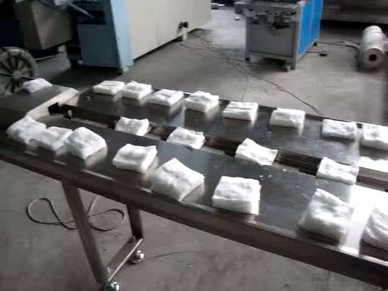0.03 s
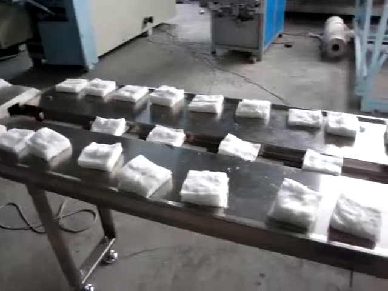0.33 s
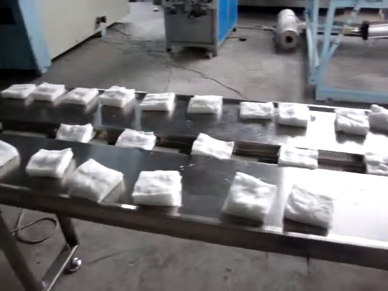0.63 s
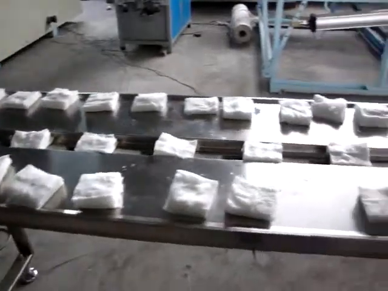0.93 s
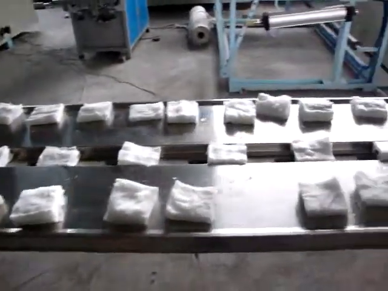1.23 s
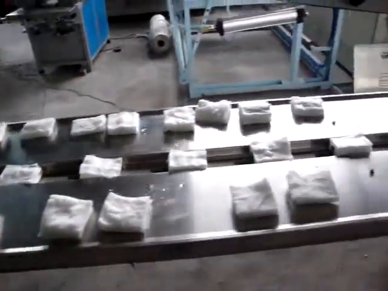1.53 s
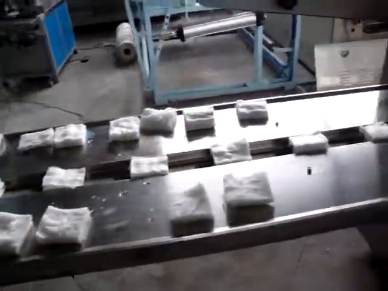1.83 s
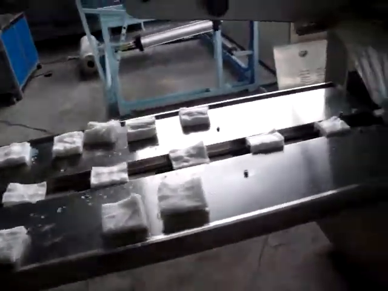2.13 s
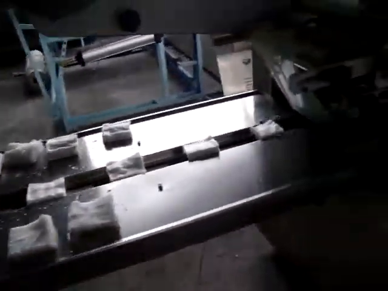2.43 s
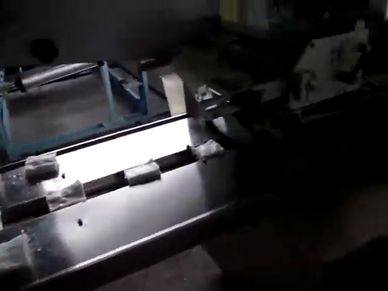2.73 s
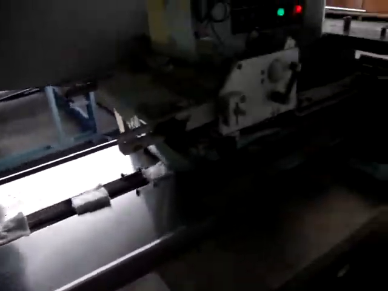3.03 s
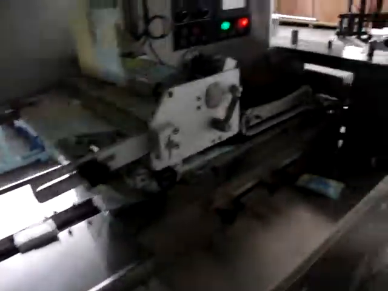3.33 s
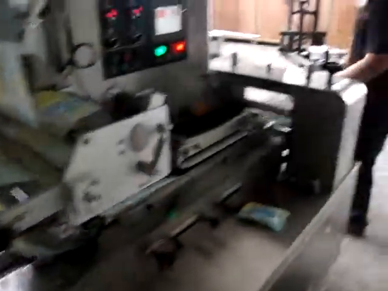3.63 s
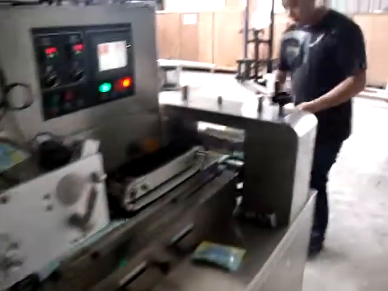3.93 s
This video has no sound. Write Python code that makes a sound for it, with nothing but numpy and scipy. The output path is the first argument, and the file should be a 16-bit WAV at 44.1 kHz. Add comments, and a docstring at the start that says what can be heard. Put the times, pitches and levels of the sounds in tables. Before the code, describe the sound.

Close to a running packaging machine, plastic film swishes, a dry bearing squeaks and sealing jaws snap shut three times. Conveyor ticks and light knocks scatter over a constant rumble and motor whine, with a dull factory echo.

```python
"""Flow-wrapping machine in a workshop

One microphone close to the machine, the large room ringing dully behind it. In each cycle, about a
second and a quarter, a dry bearing squeals, film swishes as it is pulled along and the sealing jaws
clack shut. The conveyor chain ticks and its guides knock; the drives whine and the frames rumble and
rattle throughout. The sound is mono and cuts in just after the start."""
import sys
import numpy as np
from scipy import signal
from scipy.fft import rfft, irfft
from scipy.io import wavfile

SR = 44100
rng = np.random.default_rng(int(sys.argv[2]) if len(sys.argv) > 2 else 0)


def put_to_file(sound):
    """Save the sound as 16-bit audio at rate SR, in the file named by the first command-line argument."""
    columns = np.atleast_2d(sound).T  # one column per channel
    safe = np.clip(columns, -1, 1)
    whole_steps = np.round(safe * 32767)
    wavfile.write(sys.argv[1], SR, whole_steps.astype(np.int16))


N = 176400
TIME = np.arange(N) / SR


def from_db(db):
    """Decibels to gain."""
    return 10 ** (np.asarray(db) / 20)


def rms_one(x):
    """Scale to rms 1."""
    return x / np.sqrt(np.mean(x ** 2) + 1e-20)


def at_hz(spectrum, hz):
    """Read a spectrum's level in dB on a log-frequency axis."""
    freqs, db = np.transpose(spectrum)
    return np.interp(np.log(hz + 1e-3), np.log(freqs), db)


def drift(rate_hz):
    """Smooth random wander with spread 1, mostly slower than rate_hz."""
    pole = np.exp(-40 * np.pi * rate_hz / SR)  # one step every 20 samples
    slow = signal.lfilter([1], [1, -2 * pole, pole * pole], rng.standard_normal(N // 20 + 4002))[4000:]
    return np.interp(np.arange(N) / 20, np.arange(len(slow)), rms_one(slow))


def noise(spectrum):
    """Noise of a given colour, rms 1."""
    gains = from_db(at_hz(spectrum, np.arange(N // 2 + 1) * SR / N))
    return rms_one(irfft(rfft(rng.standard_normal(N)) * gains, N))


def band_noise(hz, width_hz):
    """Noise in one broad resonance, rms 1."""
    edges = np.clip([hz - width_hz / 2, hz + width_hz / 2], 20, SR / 2 - 1)
    band = signal.butter(2, edges, "band", fs=SR, output="sos")
    return rms_one(signal.sosfilt(band, rng.standard_normal(N)))


def ring(drive, hz, t60_s):
    """One mode: a unit click rings with height 1."""
    pole, angle = from_db(-60 / (t60_s * SR)), 2 * np.pi * hz / SR
    return signal.lfilter([0, np.sin(angle)], [1, -2 * pole * np.cos(angle), pole * pole], drive + 1e-18)


def burst(start_s, attack_s, hold_s, t60_s):
    """Envelope: rise, hold, die away."""
    age = TIME - start_s
    return np.clip(age / attack_s, 0, 1) * np.exp(-np.log(1000) * np.clip((age - hold_s) / t60_s, 0, 10))


def sine(hz):
    """A sine that follows a pitch curve, rms 1."""
    return np.sqrt(2) * np.sin(2 * np.pi * (np.cumsum(hz) / SR + rng.random()))


def din():
    """Rumble and wash of all the machines in the room; each octave flickers, and all surge together."""
    # colour of machinery and hall: frequency_hz, density_db
    spectrum = [(25, -36), (45, -43), (65, -14.5), (115, -8.5), (172, -0.5), (205, -2.5), (275, 4.5),
                (340, 2.5), (480, -1.5), (680, 0.5), (870, 1), (1150, -0.5), (1500, -5), (2050, -7),
                (2650, -6.5), (3200, -11), (4500, -11), (6500, -17.5), (8500, -21), (10000, -27)]
    # swell of the din: time_s, bass_db, middle_db, treble_db
    swell = [(.12, -2, -1.5, -2.5), (.45, 0, 2.5, -1.5), (.85, 2.5, 2, 1.5), (1.1, 4.5, 1.5, 0.5),
             (1.25, 2.5, -1.5, -0.5), (1.4, 0, 4, -0.5), (1.7, -1.5, 2, -0.5), (1.9, 4.5, 3.5, 1),
             (2.1, -0.5, 4, 0), (2.3, 1.5, 0.5, 1.5), (2.8, -3, 3, -1), (3.05, 2, 1, 2), (3.38, 3, 2, 4),
             (3.55, -0.5, 0.5, 0.5), (4, -1, 2.5, 0.5)]
    level_db, flicker_db, surge_db = -26.5, 1.62, 0.5
    anchors_hz = [278, 895, 4000]  # bass, middle, treble
    times, *levels = np.transpose(swell)
    wash, surge, out = rfft(noise(spectrum)), drift(21), 0
    octave = np.log2(np.clip(np.arange(len(wash)) * SR / N, 40, 10240) / 40)
    for k in range(9):
        band = irfft(wash * np.maximum(1 - abs(octave - k), 0), N)
        weights = [np.interp(np.log(40 * 2 ** k), np.log(anchors_hz), row) for row in np.eye(3)]
        swell_db = np.interp(TIME, times, np.dot(weights, levels))
        out += from_db(level_db + swell_db + flicker_db * drift(35) + surge_db * surge) * band
    return out


def rattle():
    """Loose parts chatter at random, each touch briefly ringing a few neighbouring modes."""
    # colour of the loose parts: pitch_hz, relative_db
    spectrum = [(600, -6), (1000, -1.5), (1800, -4), (2800, 3.5), (4000, -1.5), (7000, -3.5)]
    touches_per_s, level_db, spread_db, t60_cycles = 260, -37, 4, 19.6
    sizes = from_db(spread_db * np.minimum(rng.exponential(1, N), 4)) * rng.choice([-1, 1], N)
    touches = sizes * (rng.random(N) < touches_per_s / SR)
    struck_mode, out = rng.integers(0, 20, N), 0
    for k, hz in enumerate(np.geomspace(spectrum[0][0], spectrum[-1][0], 20)):
        drive = touches * (abs(struck_mode - k) < 2) * (-1) ** k
        out += from_db(at_hz(spectrum, hz)) * ring(drive, hz, t60_cycles / hz)
    return from_db(level_db) * rms_one(out)


def whine(swell, hz, waver_hz, flutter):
    """A drive tone that follows its level curve and wavers a little."""
    level = from_db(np.interp(TIME, *np.transpose(swell)))
    return level * (1 + flutter * drift(14)) * sine(hz + waver_hz * drift(5.8))


def drives():
    """Three drive whines swell and fade among weaker, unsteady tones."""
    # swell of the main, upper and top whines: time_s, level_db
    main_swell = [(.12, -34.5), (.26, -36.5), (.42, -31), (.65, -33), (.85, -34), (.95, -48), (1.08, -34.5),
                  (1.18, -33), (1.36, -30.5), (1.47, -30.5), (1.57, -27), (1.7, -31), (1.88, -35),
                  (2.05, -42), (2.19, -32.5), (2.47, -28), (2.58, -33), (2.79, -25.5), (3, -35),
                  (3.2, -37.5), (3.36, -43), (3.52, -34), (3.8, -37), (4, -39.5)]
    upper_swell = [(.12, -44), (.25, -37.5), (.7, -40.5), (.9, -41), (1.18, -42.5), (1.32, -34), (1.4, -58),
                   (1.7, -45.5), (2.2, -45), (2.8, -41.5), (3.7, -48), (4, -53)]
    top_swell = [(.12, -51), (1.2, -49), (1.5, -45), (1.66, -45.5), (1.78, -37), (1.94, -49), (2.08, -37.5),
                 (2.24, -53), (2.42, -40), (2.78, -42), (2.92, -54), (3.2, -45), (3.35, -39), (3.5, -50),
                 (4, -44)]
    # motor and inverter tones: pitch_hz, relative_db
    tones = [(173, -47.5), (274, -45), (803, -46), (865.5, -42.5), (1594, -52), (1744, -48), (3261.5, -47),
             (3316, -51), (3338, -49.5), (3358.5, -48), (4064, -55), (4929.5, -52), (5006, -57),
             (5146, -55), (8345, -62)]
    tones_db, waver_hz = 1.06, 1.75
    out = whine(main_swell, hz=1668.6, waver_hz=1, flutter=0.1)
    out += whine(upper_swell, hz=3413.5, waver_hz=2, flutter=0.2)
    out += whine(top_swell, hz=5082.5, waver_hz=3.5, flutter=0.42)
    for hz, db in tones:
        unsteady = rms_one(1 + 0.36 * drift(5.1))
        out += from_db(tones_db + db) * unsteady * sine(hz + waver_hz * drift(10.6))
    return out


def bearing():
    """A dry bearing squeals briefly on a high, rough note."""
    # bearing squeals: start_s, hold_s, pitch_hz, relative_db
    squeals = [(.155, .008, 6390, -39), (.525, .01, 6400, -40), (.7, .05, 7650, -41),
               (.708, .014, 6420, -35), (1.964, .028, 7608, -23), (2.44, .012, 7680, -35),
               (3.225, .045, 7612, -26.5), (3.29, .04, 7612, -30), (3.35, .05, 7612, -38)]
    gain_db, out = -3, 0
    waver_hz, roughness = 13 * drift(130), 1 + 0.51 * drift(120)
    for start, hold, hz, db in squeals:
        envelope = burst(start, attack_s=0.0016, hold_s=hold, t60_s=0.093)
        out += from_db(gain_db + db) * envelope * sine(hz + waver_hz)
    return roughness * out


def chain():
    """The conveyor chain ticks: each a snap and a short gritty scrape with a resonance of its own."""
    # chain ticks: start_s, relative_db, resonance_hz
    ticks = [(0.314, -36.5, 3200), (.413, -39, 7000), (.435, -36.5, 6500), (.478, -37.5, 2800),
             (.568, -37.5, 5000), (0.601, -36.5, 3200), (0.636, -39, 7500), (0.663, -37, 2800),
             (1.468, -40, 6050), (1.539, -34.5, 6650), (1.589, -43, 5500), (1.609, -33, 6200),
             (1.65, -35, 7600), (1.813, -34.5, 8500), (1.872, -31, 7600), (2.343, -31.5, 8000),
             (2.404, -36.5, 8400), (2.48, -26, 8100), (2.617, -30.5, 6740), (2.6845, -29.5, 6400),
             (2.744, -36, 7500), (2.814, -34, 4700), (2.88, -35, 7000), (2.944, -28.5, 5600),
             (3.057, -30, 6950), (3.112, -30, 8800), (3.167, -29, 9000), (3.196, -38, 6500),
             (3.47, -35, 9400), (3.6, -33, 9200), (3.659, -35, 6500), (3.728, -34.5, 6500),
             (3.808, -30, 8200), (3.844, -31.5, 9500), (3.859, -29, 9100)]
    # colour of the grit: frequency_hz, density_db
    spectrum = [(200, -26), (1500, 6.5), (2800, -3), (4000, -1.5), (6000, -1), (7500, -2.5), (10000, -6.5)]
    gain_db, grain_db = 2.5, 2
    grit, out = noise(spectrum), 0
    for start, db, hz in ticks:
        colour = grit + from_db(-7.5) * band_noise(hz, width_hz=1800)
        snap = from_db(4.5) * burst(start, attack_s=0.0003, hold_s=0, t60_s=0.013)
        scrape = burst(start, attack_s=0.0003, hold_s=0.0094, t60_s=0.0063)
        out += from_db(gain_db + db) * (snap + scrape) * colour
    return out * rms_one(from_db(grain_db * drift(600)))


def frame():
    """The frame thumps dully in one low, broad resonance."""
    # thumps in the frame: start_s, level_db
    thumps = [(.375, -29), (1.011, -28), (1.888, -23.5), (2.12, -24)]
    envelope = sum(from_db(db) * burst(start, attack_s=0.0093, hold_s=0.017, t60_s=0.098)
                   for start, db in thumps)
    return envelope * band_noise(hz=283, width_hz=110)


def guides():
    """Conveyor links and guides knock lightly, each in its own band."""
    # knocks of links and guides: start_s, pitch_hz, level_db
    knocks = [(0.701, 3000, -22), (0.729, 2800, -21), (.788, 2220, -23), (.788, 6700, -18.5),
              (.812, 1900, -28), (.888, 2720, -29), (1.286, 3360, -27), (1.337, 420, -19),
              (1.539, 2620, -23), (1.61, 2600, -23), (1.873, 2540, -17), (1.873, 1110, -24),
              (1.965, 3450, -19.5), (2.053, 895, -21), (2.124, 854, -15.5), (2.124, 2700, -26),
              (2.816, 4670, -27), (2.943, 3000, -25.5), (3.31, 2000, -23), (3.38, 890, -25.5),
              (3.822, 4530, -18.5), (3.8266, 1060, -19.5), (3.845, 870, -21)]
    out = 0
    for start, hz, db in knocks:
        envelope = burst(start, attack_s=0.0015, hold_s=0.0014, t60_s=0.048)
        out += from_db(db) * envelope * band_noise(hz, width_hz=0.21 * hz)
    return out


def film():
    """Short grainy swishes as the film is pulled along, each with a resonance of its own."""
    # film swishes: start_s, hold_s, level_db, resonance_hz
    swishes = [(0.781, 0.015, -18.5, 6700), (0.842, 0.02, -25, 3640), (0.881, 0.012, -22, 8100),
               (2.043, 0.0078, -18.5, 4130), (2.161, 0.005, -24, 6940), (3.297, 0.014, -22, 6200),
               (3.36, 0.04, -30, 7850), (3.611, 0.0077, -23, 3400)]
    # colour of the sliding film: frequency_hz, density_db
    spectrum = [(100, -23), (400, -17), (900, 13.5), (1600, -10), (2600, 9.5), (3400, 3), (4500, 7),
                (5600, 3), (6700, 2), (8000, 1.5), (10000, -10.5)]
    grain_db = 2
    hiss, out = noise(spectrum), 0
    for start, hold, db, hz in swishes:
        colour = hiss + from_db(-12) * band_noise(hz, width_hz=760)
        out += from_db(db) * burst(start, attack_s=0.004, hold_s=hold, t60_s=0.13) * colour
    return out * rms_one(from_db(grain_db * drift(460)))


def jaws():
    """A sharp strike, a rebound and a late echo ring jaws and frame, with a crack of metal and a short tail."""
    # the jaws shut: start_s, body_db, tilt_db_per_octave, crack_db, tail_db, frame_hz, frame_db
    clacks = [(1.3282, -2.5, -3, -15.5, -20, 793.4, -7.5), (2.5637, -9, 6.5, -14, -27, 870, -20),
              (3.821, -20, 3.5, -17, -45, 904, -23)]
    # a rebound and a late echo after each strike: delay_s, relative_db
    repeats = [(.0058, -4.5), (0.0212, -9.5)]
    # modes of jaws and frame: pitch_hz, relative_db, t60_s
    modes = [(372, -16, 0.041), (640, -22, 0.01), (936, -16.5, 0.034), (1060, -8, .045),
             (1170, -8.5, 0.027), (1328, -8, 0.039), (1665, -16.5, 0.099), (1795, -14, 0.028),
             (2125, -14.5, 0.035), (2563, -7, 0.023), (2700, -12.5, 0.037), (3800, -19.5, 0.033),
             (4155, -20, 0.037), (5070, -20.5, 0.037)]
    # colours of the metal's crack and of the frame ringing on: frequency_hz, density_db
    crack_spectrum = [(100, -16.5), (300, -26), (800, 9), (1700, 6), (2700, 6), (3600, -8.5), (5200, -2),
                      (7000, -4), (10000, -12.5)]
    tail_spectrum = [(150, -9), (350, 5), (850, 9.5), (1500, 2.5), (3000, -3.5), (6000, -5.5), (10000, -33)]
    strike_db, strike_s, max_lag_s = 1.5, 0.00005, 0.00042
    pivot_hz, low_cut_hz = 1200, 500
    body, crack, tail = 0, 0, 0
    for start, body_db, tilt, crack_db, tail_db, frame_hz, frame_db in clacks:
        blows = np.zeros(N)
        blows[int(start * SR)] = -1
        for delay, db in repeats:
            blows[int((start + delay) * SR)] += from_db(db)
        for hz, db, t60 in modes:
            late = np.roll(blows, int(rng.random() * max_lag_s * SR))  # each mode answers a little late
            body += from_db(body_db + db + tilt * np.log2(hz / pivot_hz)) * ring(late, hz, t60)
        body -= from_db(frame_db) * ring(abs(blows), frame_hz, t60_s=0.11)
        body -= from_db(strike_db) * np.exp(-((TIME - start) / strike_s) ** 2)  # pulse of the strike
        crack += from_db(crack_db) * burst(start, attack_s=0.00022, hold_s=0.0055, t60_s=0.014)
        tail += from_db(tail_db) * burst(start, attack_s=0.0024, hold_s=0, t60_s=0.47)
    low_cut = signal.butter(2, low_cut_hz, "high", fs=SR, output="sos")
    return signal.sosfilt(low_cut, body + crack * noise(crack_spectrum) + tail * noise(tail_spectrum))


def hall(x):
    """Diffuse, dull reverberation of the workshop."""
    gain_db, dull_hz = -9, 5000
    echo = rng.standard_normal(N) * burst(0.021, attack_s=0.036, hold_s=0, t60_s=1)
    dull = signal.butter(1, dull_hz, fs=SR, output="sos")
    echo = signal.sosfilt(dull, echo / np.sqrt(np.sum(echo ** 2)))
    return from_db(gain_db) * signal.fftconvolve(x, echo)[:N]


def scene():
    """The near machine and its reverberation over din, drives and dry chain ticks; both channels alike."""
    near = jaws() + film() + bearing() + guides() + frame() + rattle()
    mono = near + hall(near) + chain() + din() + drives()
    return np.array([mono, mono])


def record(dry):
    """The microphone cuts in, the highest peaks clip and the top is cut steeply."""
    start_s, ramp_s, clip_level, cutoff_hz = 0.115, 0.012, 0.92, 10050
    fade_in = np.clip((TIME - start_s) / ramp_s, 0, 1)
    clipped = np.clip(dry * fade_in, -clip_level, clip_level)
    return signal.sosfilt(signal.ellip(14, .1, 80, cutoff_hz, fs=SR, output="sos"), clipped)


dry = scene()
out = record(dry)
put_to_file(out)
```